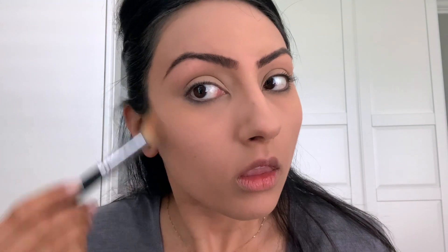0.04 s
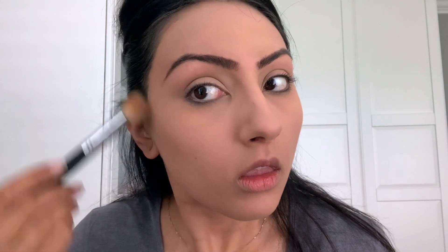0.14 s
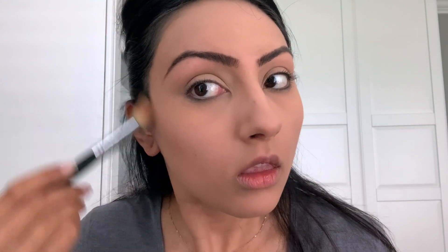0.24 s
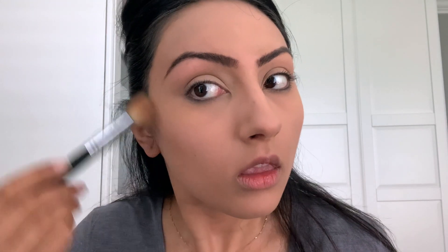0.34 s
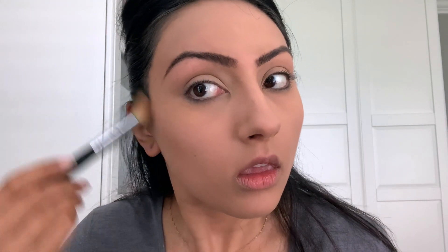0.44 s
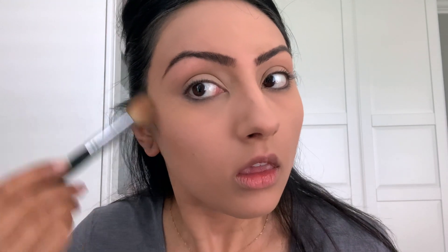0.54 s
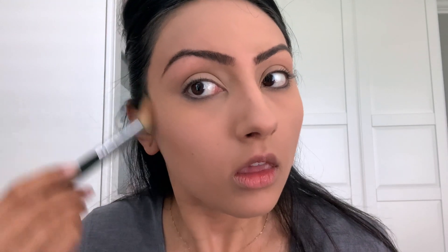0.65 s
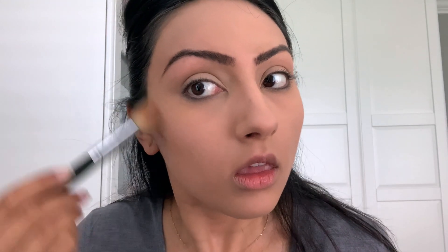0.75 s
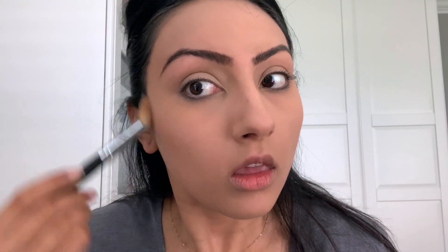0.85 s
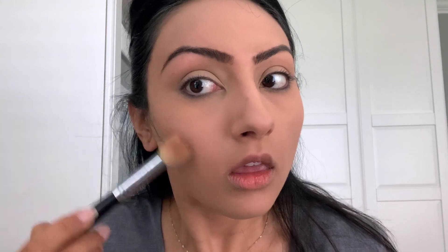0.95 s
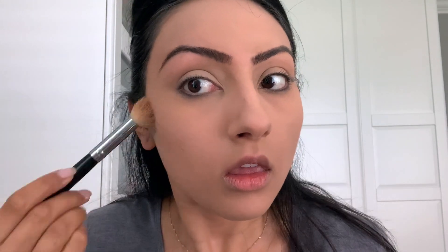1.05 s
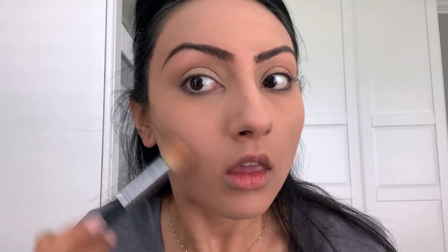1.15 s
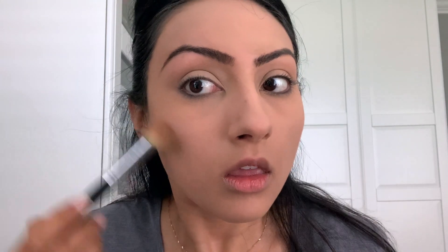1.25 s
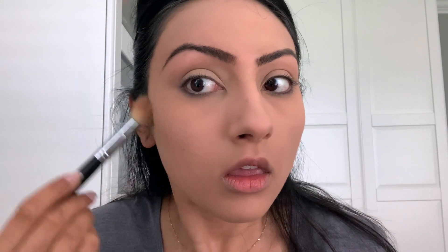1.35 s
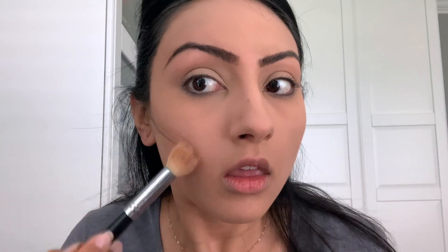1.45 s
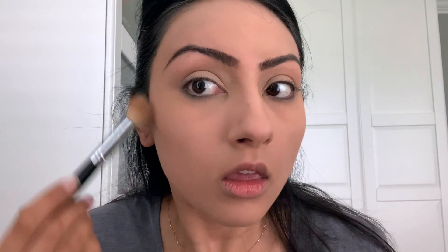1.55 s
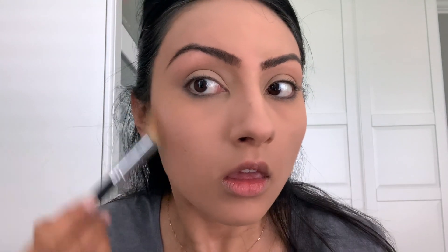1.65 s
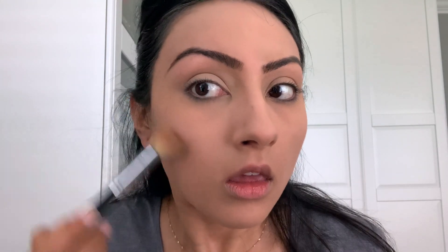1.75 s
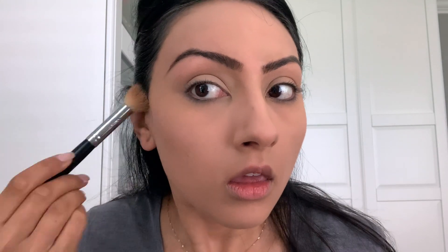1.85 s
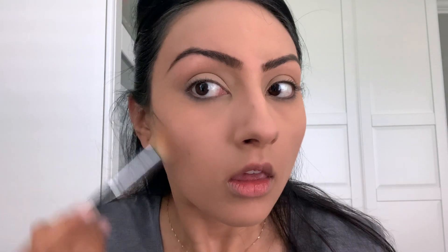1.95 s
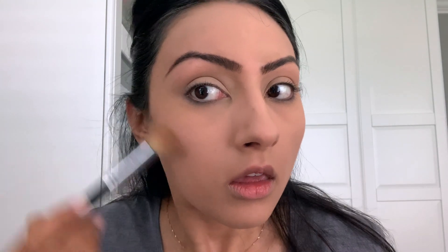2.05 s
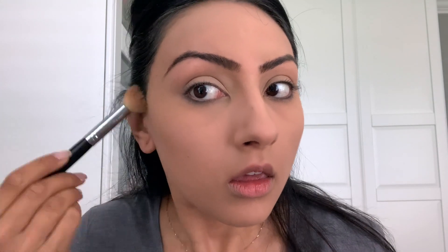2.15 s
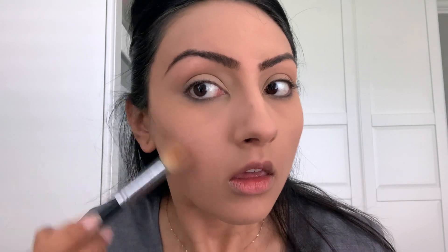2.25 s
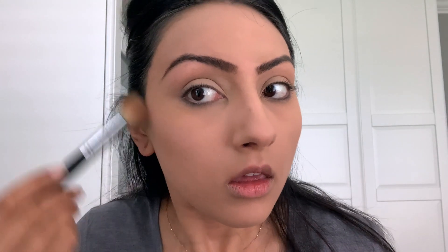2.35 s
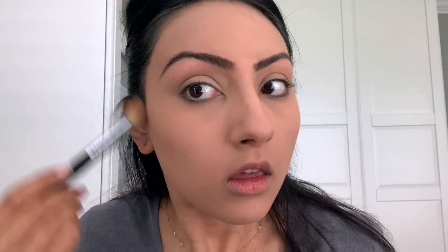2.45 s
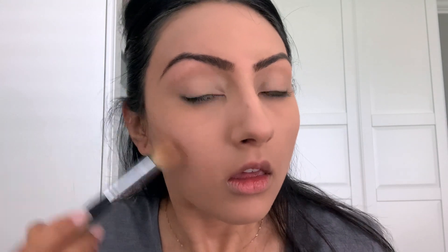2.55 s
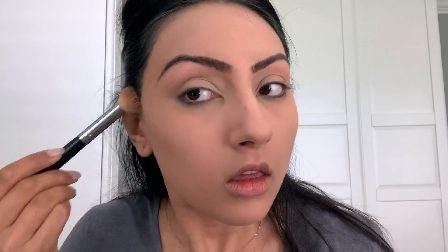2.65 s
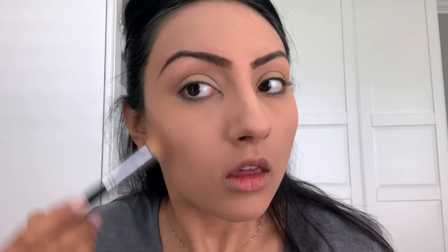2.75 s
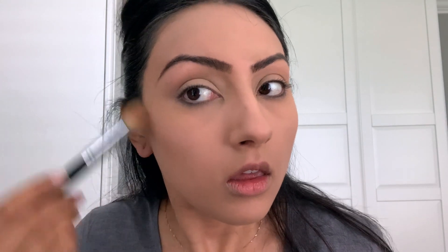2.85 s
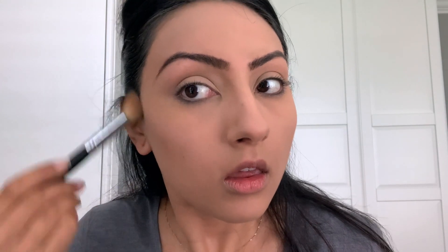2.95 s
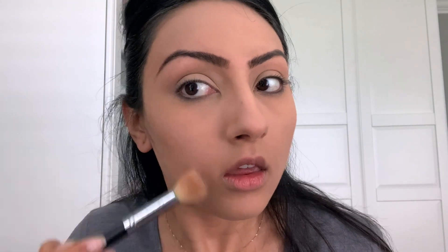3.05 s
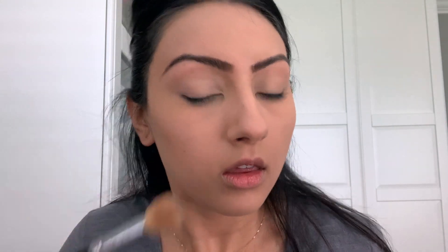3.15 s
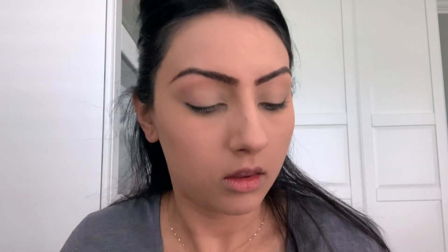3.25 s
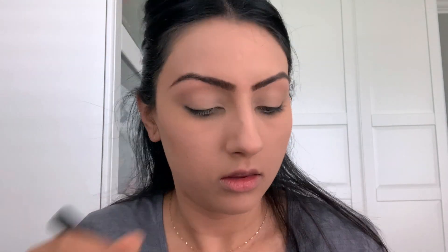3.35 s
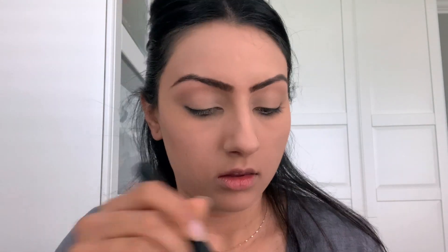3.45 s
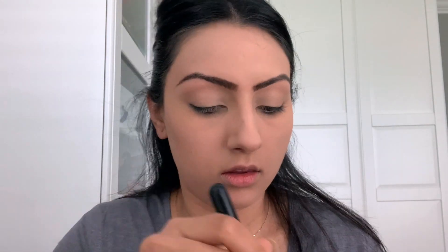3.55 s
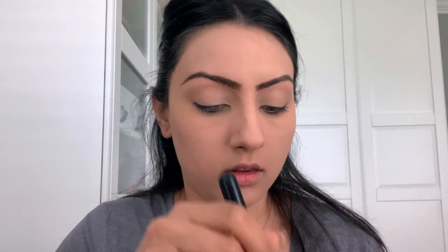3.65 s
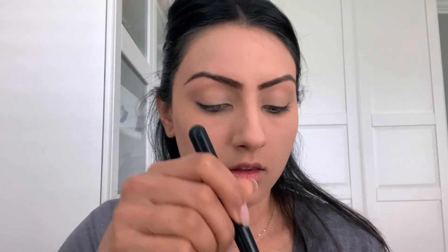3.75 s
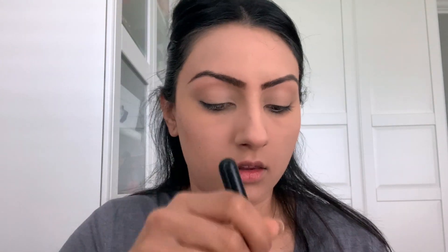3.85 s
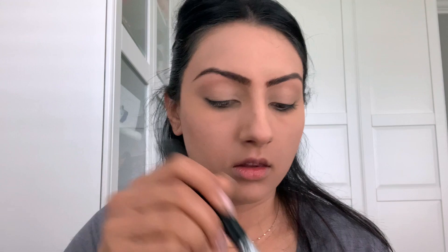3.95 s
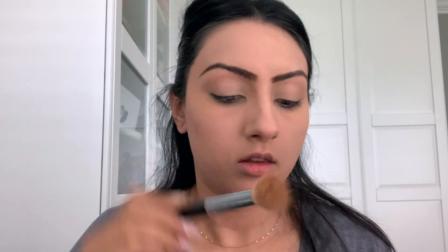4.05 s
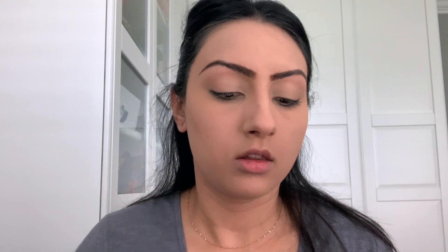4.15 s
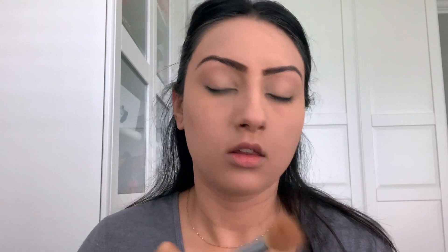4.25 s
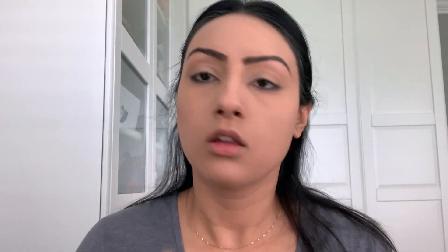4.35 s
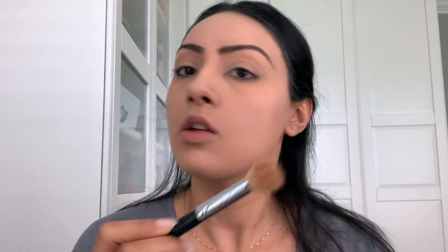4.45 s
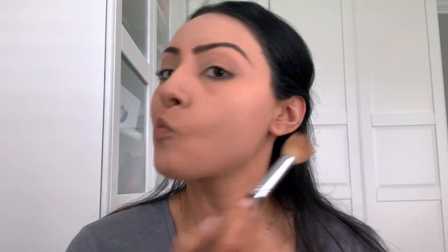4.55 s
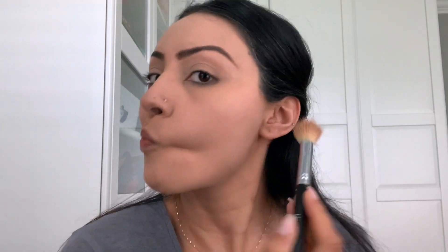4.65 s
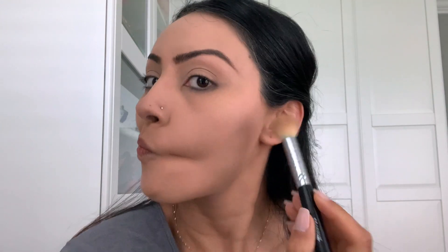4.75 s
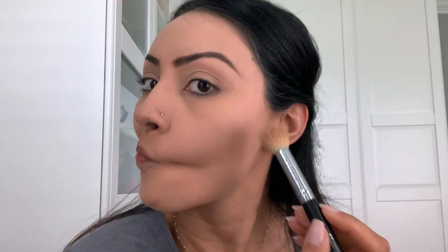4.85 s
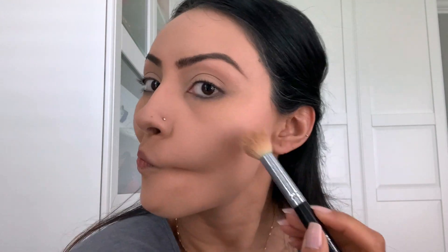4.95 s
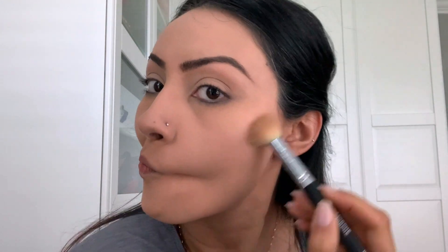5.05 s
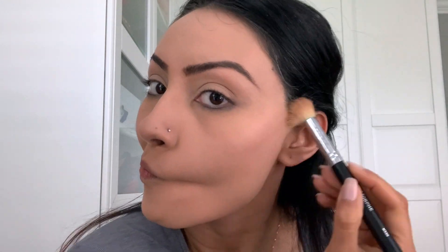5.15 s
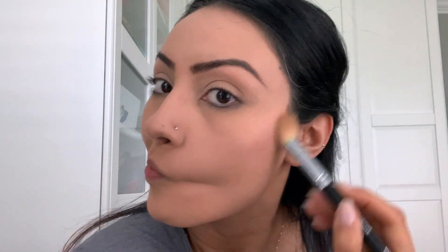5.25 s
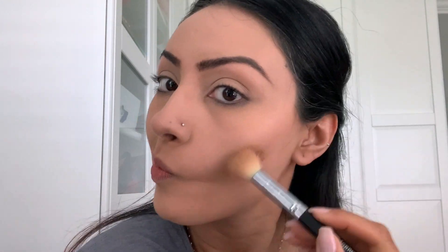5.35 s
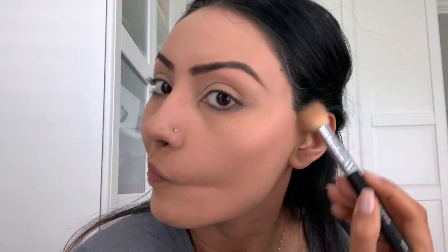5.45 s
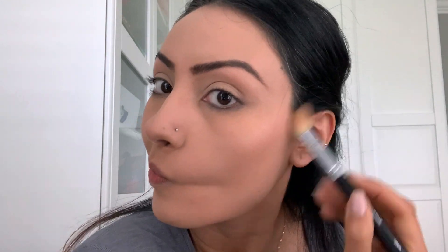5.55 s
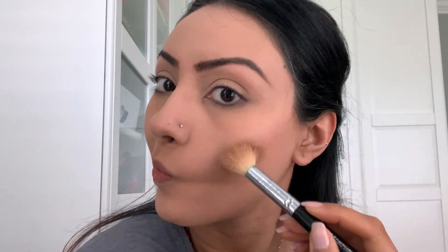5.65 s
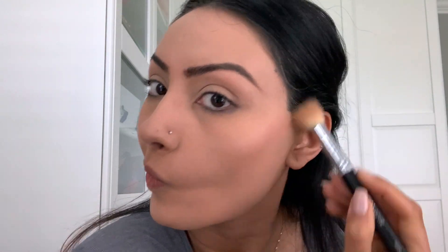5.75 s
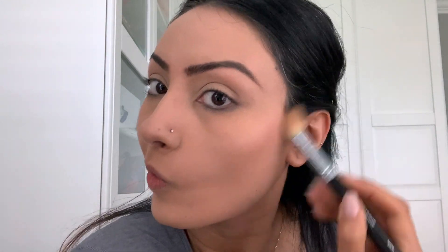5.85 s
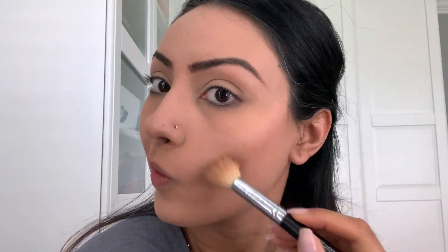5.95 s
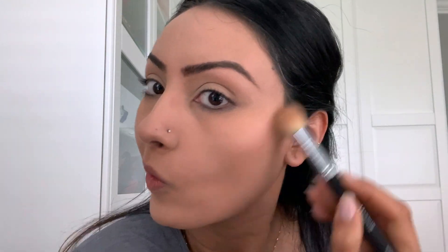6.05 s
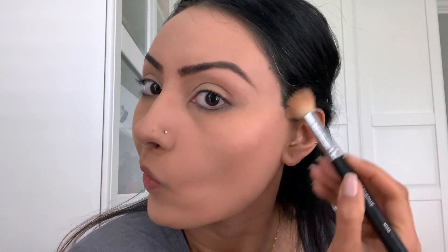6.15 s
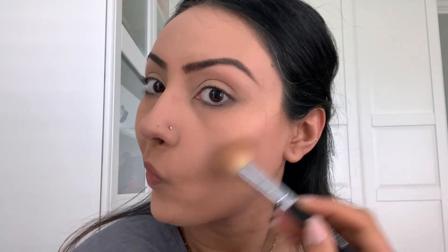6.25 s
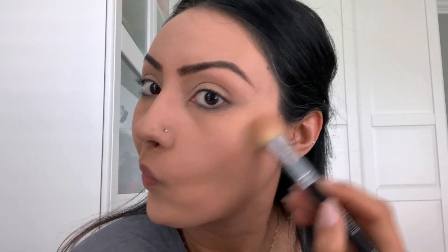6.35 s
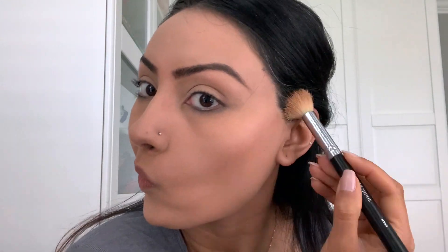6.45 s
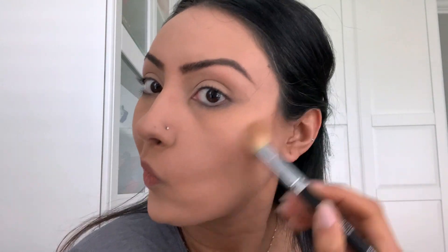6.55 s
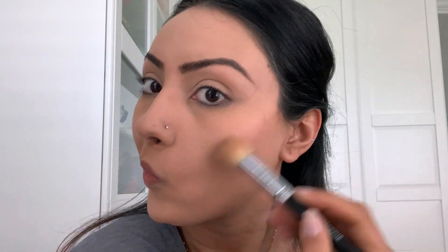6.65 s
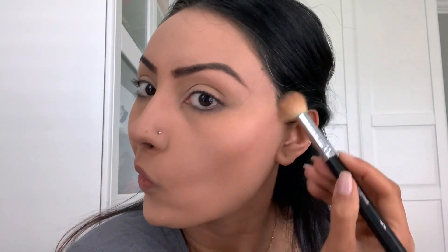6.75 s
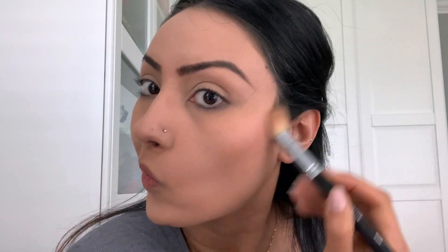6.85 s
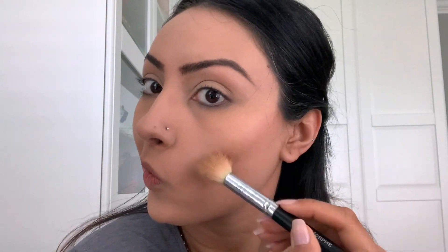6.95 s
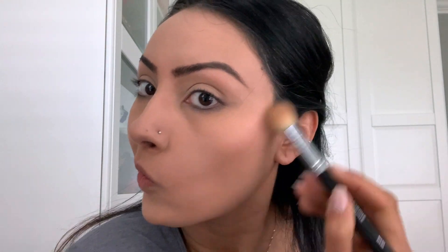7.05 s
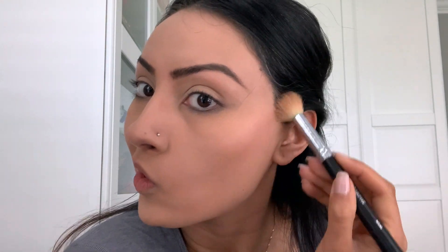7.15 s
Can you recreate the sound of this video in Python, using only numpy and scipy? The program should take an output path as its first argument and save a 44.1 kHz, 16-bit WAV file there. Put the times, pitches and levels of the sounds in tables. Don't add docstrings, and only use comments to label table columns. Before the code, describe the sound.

A quiet small room with a low, slightly unsteady building hum and faint hiss, heard through a close small stereo microphone. From 0 to about 3 seconds a soft makeup brush sweeps a cheek: airy, high bristle swishes every quarter second or so, each firm stroke answered by a fainter one back. A faint low bump comes near 1.1. Around 3.4 cloth rustles briefly; at 3.54 and 3.85 the bristles dab into powder with short gritty puffs. At 4.12 the handle scrapes quickly, swelling into a loud, sharp hollow plastic knock at 4.14 with a bounce, then another at 4.31, both briefly echoing. The microphone turns down and the bass thins, recovering over the next second. Tiny ticks and stray brushes lead to slower, wider swishes on the other cheek from 5.3 to 7, about three per second, with soft cloth movement near 6.2.

```python
import sys
import numpy as np
from scipy import signal
from scipy.fft import rfft, irfft, next_fast_len
from scipy.io import wavfile
from scipy.ndimage import uniform_filter1d, map_coordinates

SR = 44100
rng = np.random.default_rng(int(sys.argv[2]) if len(sys.argv) > 2 else 0)


def to_wav(s):
    ch = np.atleast_2d(s).T
    pcm = np.round(np.clip(ch, -1, 1) * 32767)
    wavfile.write(sys.argv[1], SR, pcm.astype(np.int16))


def boost(x):
    u = np.asarray(x, float) / 20
    return 10 ** u


N = 317973

# pitch in Hz, width in Hz, level in dB.
ROOM_BOOM = [(43.5, 22, -5), (68.3, 9.7, 1.5), (84, 13, -5), (143.4, 18.7, -7), (263, 25, -14)]
# middle in seconds, level in dB, length in seconds.
HUM_SWELLS = [(.55, -65, 0.29), (1.092, -65, 0.19), (1.9, -62, .15), (2.818, -60, 0.33),
              (3.505, -58.5, 0.11), (5.6, -62.5, 0.37), (6.45, -62.5, 0.2), (7.1, -62.5, 0.16)]
# start in seconds, depth in dB.
BASS_CUTS = [
    (4.15, -10),
    (4.31, -7),
]
# middle in seconds, level in dB, length in seconds.
CLOTH_MOVES = [(.001, -62, 0.038), (1.15, -61, .1), (1.8, -61.5, 0.31), (2.896, -72.5, 0.42),
               (3.361, -54.5, 0.046), (4.804, -62, .15), (6.158, -56.5, 0.058), (6.55, -68.5, 0.206),
               (7.148, -66, .25)]
# pitch in Hz, level in dB per Hz.
CLOTH_COLOUR = [(90, -34), (150, 3), (260, -5.5), (500, -8), (900, -15), (1800, -29), (4000, -56)]
# pitch in Hz, level in dB per Hz.
AIR_COLOUR = [(30, -25.5), (60, -7.5), (300, -14), (1000, -21.5), (6000, -30), (9000, -28), (14500, -33),
              (16000, -51.5)]
# pitch in Hz, likeness from -1 to 1.
PORTS_ALIKE = [(60, 0.86), (130, -0.28), (300, -0.34), (640, -0.38), (1400, 0.11)]
# delay in seconds, level in dB.
WALL_ECHOES = [(.009, -2), (.018, -4), (.0235, -37.5), (0.0289, -4), (0.049, -17)]
# delay in seconds, level in dB.
FAR_WALL = (.122, -29)
# pitch in Hz, time to fall by 60 dB in seconds.
ROOM_RING = [(200, 0.226), (400, 0.34), (700, 0.33), (1250, 0.26), (1700, 0.34), (3700, 0.24), (6500, 0.31),
             (11000, 0.14)]
# start in seconds, level in dB, pitch in Hz, time to fall by 60 dB in seconds.
SMALL_CONTACTS = [(0.0003, -34.5, 1110, 0.013), (1.131, -33.5, 73.3, 0.23), (1.199, -45, 140, 0.43),
                  (4.526, -37, 9000, 0.0029), (4.955, -49, 3700, .006), (4.955, -54.5, 5430, 0.0056),
                  (5.019, -47, 4400, 0.024), (5.334, -41.5, 603, 0.029), (5.339, -38, 249, 0.086)]
# peak in seconds, level in dB, rise in seconds, fall in seconds.
PAN_DABS = [
    (3.5423, -36, 0.0034, 0.0081),
    (3.846, -37, 0.0036, 0.012),
]
# pitch in Hz, width in Hz, level in dB.
PAN_NOTES = [(890, 250, -6), (1390, 300, 2), (2273, 630, -3), (3120, 310, 1), (4600, 900, -4.5),
             (6080, 1900, -2), (9000, 14000, -11), (14000, 2900, -26.5)]
# time in seconds, level in dB.
SCRAPE_EFFORT = [(4.116, -82.5), (4.125, -37), (4.1285, -28), (4.133, -18), (4.1403, -9.5), (4.1432, -30.5),
                 (4.15, -43.5), (4.155, -80.5)]
# pitch in Hz, width in Hz, level in dB.
SCRAPED_RIM = [(763, 300, -13.5), (1480, 120, 4), (2600, 300, -6), (3450, 310, -1.5), (4130, 740, -7),
               (5880, 1900, -15)]
# time in seconds, thump level in dB, then click and crack in dB against it.
HANDLE_BLOWS = [(4.1407, 1.5, -1, 7), (4.1505, -8.5, 0.5, 9), (4.3075, -31, 17, -13.5),
                (4.3119, 1.5, 3.5, -14), (4.3140, -11, -19, -4.5), (4.320, -8, -11, -14)]
# pitch in Hz, width in Hz, level in dB.
CASE_BODY = [(250, 36, -17), (603, 150, -16.5), (752, 79, -6), (1076, 140, -4.5), (1220, 207, 0),
             (1395, 258, 1.5), (1670, 240, -7), (2400, 200, -11)]
# pitch in Hz, width in Hz, level in dB.
CASE_RIM = [(3210, 670, 2.5), (4430, 1800, 0.5), (4850, 280, -2.5), (6500, 4500, -24)]
# middle of the down stroke in seconds, its level in dB,
# its pressure in dB, seconds until the way back, level of the way back in dB.
FIRST_CHEEK_SWEEPS = [(.062, -55.5, -3, .118, -66), (.274, -56.5, -3.5, .11, -62.5),
                      (.477, -54.5, 1.5, .103, -63.5), (.672, -52, 0.5, .108, -62.5),
                      (.882, -54.5, 3.5, 0.15, -66), (1.152, -60, -1, .136, -63.5),
                      (1.419, -57, -3, .136, -62.5), (1.675, -55, -0.5, .126, -59),
                      (1.966, -56.5, -0.5, .132, -58), (2.239, -56.5, -0.5, .121, -60),
                      (2.502, -56.5, -0.5, 0.12, -63), (2.753, -54.5, .6, .122, -61.5),
                      (3.011, -55.5, 1.5, .25, -65)]
OTHER_CHEEK_SWEEPS = [(5.294, -59, 0.4, .139, -62.5), (5.602, -55, -1.5, .133, -60.5),
                      (5.908, -55, -2.1, .152, -59.5), (6.237, -54.5, 0.7, 0.15, -59.5),
                      (6.571, -54, -0.7, 0.17, -57), (6.902, -53.5, 0.5, .146, -62)]
# middle in seconds, length in seconds, level in dB, pressure in dB.
STRAY_PASSES = [(3.358, .029, -63, -9), (3.65, .052, -69.5, -13), (3.909, 0.032, -66.5, -8.5),
                (4.028, 0.051, -81, 2), (4.09, .04, -62.5, -5), (4.749, 0.096, -64.5, -3.5),
                (5.14, 0.084, -59.5, 5.5)]
# pitch in Hz, level in dB per Hz.
BRISTLE_TIPS = [(1500, -120), (3500, -12), (6000, -3), (8000, 0), (10000, 0), (12000, -2.5), (14500, -4),
                (16000, -8)]
# pitch in Hz, width in Hz, level in dB.
FIRST_SKIN = [(1016, 170, -1), (1990, 290, -1.5), (3240, 800, -3.5), (4236, 650, 3.5), (5970, 4400, -4.5)]
# pitch in Hz, width in Hz, level in dB.
OTHER_SKIN = [(2093, 980, -5.5), (3500, 1030, -1), (4530, 460, 1.5), (5260, 560, 0.2), (5790, 630, 0.3),
              (6500, 790, -1.1)]
# time in seconds, gain in dB.
AUTO_GAIN = [(4.135, 3.5), (4.15, -7.5), (4.3, -5.5), (4.33, -9.5), (4.45, -5.5), (4.56, -2), (4.9, 2),
             (5.4, 3)]
# pitch in Hz, share from 0 to 1.
BORROWED_SHARE = [(4500, 0), (6500, .55), (7500, .87), (8200, .99), (9900, .99), (10700, .88), (12500, .96)]
# pitch in Hz, angle in radians.
PHASE_TWIST = [(5000, 1), (6500, 2), (7500, 2.55), (8250, 3.03), (9900, 3.27), (10900, 4.3), (12500, 5.8),
               (16000, 6.5)]

HUM_DB, SWELL_DB, FLUTTER_DB = -56.5, 1.24, 1.8
CUT_ATTACK_S, CUT_RELEASE_S = 0.04, 0.44
CLOTH_REST_DB = -70.5
TURN_S = 4.5
FIRST_DOWN_S, FIRST_BACK_S, FIRST_BACK_PRESS_DB = 0.052, 0.052, -2.5
OTHER_DOWN_S, OTHER_BACK_S, OTHER_BACK_PRESS_DB = 0.087, 0.13, -5.5
TOP_HZ = 15800


def unit(x):
    return x / np.sqrt(np.mean(x ** 2) + 1e-20)


def along(points, hz):
    f, v = np.transpose(points)
    return np.interp(np.log(hz + 1), np.log(f + 1), v)


def slope(spectrum):
    return lambda hz: boost(along(spectrum, hz))


def curve(rows):
    return np.interp(np.arange(N) / SR, *np.transpose(rows))


def bumps(rest_db, rows):
    t = np.arange(N) / SR
    return boost(rest_db) + sum(boost(db) * np.exp(-((t - s) / length) ** 2) for s, db, length in rows)


def wobble(rate):
    knots = rng.standard_normal(int(N * rate / SR) + 4)
    return map_coordinates(knots, [np.arange(N) * rate / SR])


def filtered(x, response):
    m = next_fast_len(N + SR // 2)
    return irfft(rfft(x, m) * response(np.fft.rfftfreq(m, 1 / SR)), m)[..., :N]


def modes(table):
    def response(f):
        total = 0
        for k, (centre, width, db) in enumerate(table):
            damping = 1j * f * width
            total = total + (-1) ** k * boost(db) * damping / (centre * centre - f * f + damping)
        return total
    return response


def soft(corner_hz):
    return lambda hz: 1 / (1 + 1j * hz / corner_hz)


def late(pair, lag_s):
    return filtered(pair, lambda hz: np.exp(-1j * np.pi * hz * lag_s * np.array([[1], [-1]])))


def hiss(colour, alike, lag_s, patchy_db):
    z = signal.stft(rng.standard_normal((2, N)), nperseg=256)[2]
    patches = uniform_filter1d(rng.standard_normal(z.shape[1:]), 3, 0)
    patches = uniform_filter1d(patches, 6, 1)
    pair = signal.istft(z * boost(patchy_db * unit(patches)), nperseg=256)[1][:, :N]

    def split(hz):
        turn = np.arccos(np.clip(along(alike, hz), -1, 1)) / 2
        return colour(hz) * np.array([np.cos(turn), np.sin(turn)])
    mid, side = filtered(pair, split)
    return unit(late(np.array([mid + side, mid - side]), lag_s))


def background():
    def low_notes(hz):
        return modes(ROOM_BOOM)(hz) / (1 + (hz / 400) ** 2) / (1 + (38 / (hz + 1)) ** 6)
    a, b = filtered(rng.standard_normal((2, N)), low_notes)
    boom = unit(np.array([1.1 * a + 0.48 * b, a - 0.48 * b]))
    t = np.arange(N) / SR
    thin_db = np.zeros(N)
    for s, db in BASS_CUTS:
        since = np.maximum(t - s, 0)
        thin_db += db * (1 - np.exp(-since / CUT_ATTACK_S)) * np.exp(-since / CUT_RELEASE_S)
    unsteady_db = FLUTTER_DB * wobble(17) + SWELL_DB * wobble(6.5)
    hum = bumps(HUM_DB, HUM_SWELLS) * boost(thin_db + unsteady_db) * boom
    rustle = bumps(CLOTH_REST_DB, CLOTH_MOVES) * boost(thin_db + 2.8 * wobble(25))
    cloth = rustle * hiss(slope(CLOTH_COLOUR), PORTS_ALIKE, 1e-5, patchy_db=1.5)
    air = boost(-58.5 + 1.5 * wobble(2.948)) * hiss(slope(AIR_COLOUR), PORTS_ALIKE, 1e-5, patchy_db=1)
    return hum + cloth + air


def room(x):
    hz, t, z = signal.stft(rng.standard_normal((2, SR // 2)), SR, nperseg=256)
    decay = boost(-60 * t / along(ROOM_RING, hz)[:, None])
    tail = signal.istft(z * decay, SR, nperseg=256)[1]
    fade_in = np.minimum(np.arange(tail.shape[1]) / (0.0041 * SR), 1)
    tail = boost(-4) * tail / np.linalg.norm(tail[0]) * fade_in
    echoes = np.zeros_like(tail)
    for delay, db in WALL_ECHOES:
        arrival = np.round((delay + rng.normal(0, 2e-4, 2)) * SR).astype(int)
        echoes[[0, 1], arrival] += boost(db - 5)

    def far(hz):
        return boost(FAR_WALL[1]) * np.exp(-2j * np.pi * hz * FAR_WALL[0]) / (1 + (hz / 1600) ** 4)
    tail_heard = signal.fftconvolve(x, tail, axes=1)[:, :N]
    echoes_heard = signal.fftconvolve(x, echoes, axes=1)[:, :N]
    return filtered(tail_heard + filtered(echoes_heard, soft(2500)), soft(3800)) + filtered(x, far)


def ticks():
    out, t = np.zeros(N + SR), np.arange(SR // 2) / SR
    for s, db, hz, t60 in SMALL_CONTACTS:
        ring = boost(db - 60 * t / t60) * np.sin(2 * np.pi * hz * t)
        out[round(s * SR):][:len(t)] += ring * (1 - np.exp(-t * hz / 0.96))
    return out[:N] * boost([[-1], [1]])


def dabs():
    t, push = np.arange(N) / SR, np.zeros(N)
    for s, db, rise, fall in PAN_DABS:
        push += boost(db) * np.exp(-np.where(t < s, (s - t) / rise, (t - s) / fall))
    grit = boost(2.8 * wobble(700))
    return push * grit * hiss(modes(PAN_NOTES), [(2000, 0.61)], 0.0002, patchy_db=-0.5) * boost([[-1.5], [1.5]])


def scrape():
    effort = boost(curve([(0.0065, -150)] + SCRAPE_EFFORT + [(4.16, -150)]))
    rim = lambda hz: modes(SCRAPED_RIM)(hz) / (1 + (hz / 7000) ** 2)
    return effort * hiss(rim, [(2000, 0.91)], 2.4e-4, patchy_db=4.0) * boost([[-2], [2]])


def case():
    thumps, clicks, cracks = np.zeros((3, N))
    t = np.arange(SR // 100) / SR
    for s, db, click_db, crack_db in HANDLE_BLOWS:
        start = round(s * SR)
        thumps[start] = -boost(db + 31)
        clicks[start] = boost(db + click_db + 20)
        burst = boost(db + crack_db - 18 - 60 * t / 0.007)
        cracks[start:][:len(t)] += burst * rng.standard_normal(len(t))
    blunt = lambda corner_hz: lambda hz: 1 / (1 + 1j * hz / corner_hz) ** 2
    body = filtered(filtered(thumps, modes(CASE_BODY)), blunt(3200))
    rim = filtered(filtered(clicks, modes(CASE_RIM)), blunt(4400))
    crack_notes = modes([(6040, 5700, -1.5), (9200, 500, -0.5), (12700, 3000, -0.5)])
    return body + rim + filtered(cracks, crack_notes)


def sweeps(cheek, down_s, back_s, back_press_db):
    rows = []
    for s, db, press_db, after, back_db in cheek:
        rows.append((s, down_s, db, press_db))
        rows.append((s + after, back_s, back_db, back_press_db))
    return rows


def brush():
    t, tips, drag = np.arange(N) / SR, np.zeros(N), np.zeros(N)
    strokes = sweeps(FIRST_CHEEK_SWEEPS, FIRST_DOWN_S, FIRST_BACK_S, FIRST_BACK_PRESS_DB)
    strokes += sweeps(OTHER_CHEEK_SWEEPS, OTHER_DOWN_S, OTHER_BACK_S, OTHER_BACK_PRESS_DB)
    for s, length, db, press_db in strokes + STRAY_PASSES:
        near = slice(max(0, round((s - 0.2) * SR)), round((s + 0.2) * SR))
        speed = np.exp(-4.5 * abs((t[near] - s) / length) ** 2.88)
        tips[near] += boost(db) * speed
        drag[near] += boost(db + press_db) * speed ** 1.3
    swish = boost(1.5) * tips * hiss(slope(BRISTLE_TIPS), [(4000, 0.6)], 6e-5, patchy_db=2)
    skin = lambda hz: modes(FIRST_SKIN)(hz) * hz ** 2 / (hz ** 2 + 900 ** 2)
    first = hiss(skin, [(2000, 0.86)], 5e-5, patchy_db=1.5) * boost([[0.5], [1.5]])
    other = hiss(modes(OTHER_SKIN), [(2000, 0.61)], 0.00016, patchy_db=3.0) * boost([[-0.5], [2.5]])
    return swish + drag * np.where(t < TURN_S, first, other)


def scene():
    pan = dabs()
    near = late(case() * boost([[-1.5], [1.5]]), 1.1e-4) + scrape()
    wet = room(near + boost(-2) * pan)
    return background() + wet + ticks() + pan + near + brush()


def low_pass(x):
    return signal.sosfilt(signal.butter(12, 16250, fs=SR, output="sos"), x)


def record(dry):
    share = lambda hz: np.clip(along(BORROWED_SHARE, hz), 0, 1)
    own = filtered(dry[1], lambda hz: np.sqrt(1 - share(hz) ** 2))
    borrowed = filtered(dry[0], lambda hz: share(hz) * np.exp(-1j * along(PHASE_TWIST, hz)))
    pair = np.array([dry[0], own + borrowed]) * boost(curve(AUTO_GAIN))
    pair = pair / (1 + abs(pair / 0.9) ** 4) ** (1 / 4)
    mix = filtered(pair, lambda hz: hz < TOP_HZ)
    return low_pass(mix)


dry = scene()
out = record(dry)
to_wav(out)
```